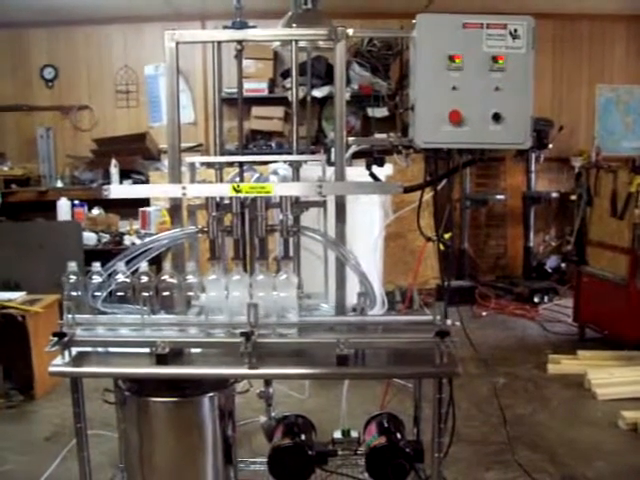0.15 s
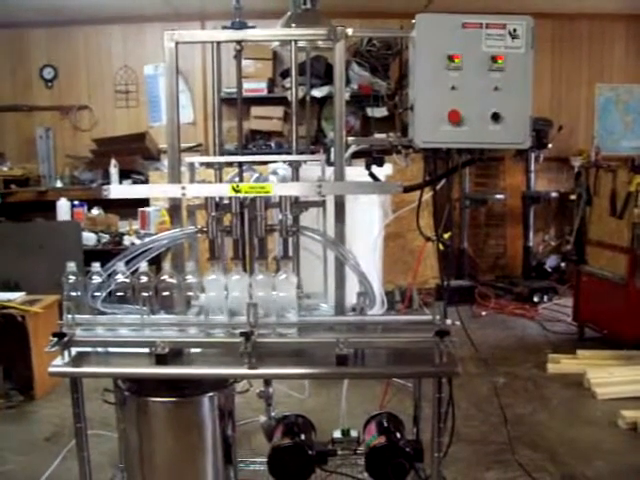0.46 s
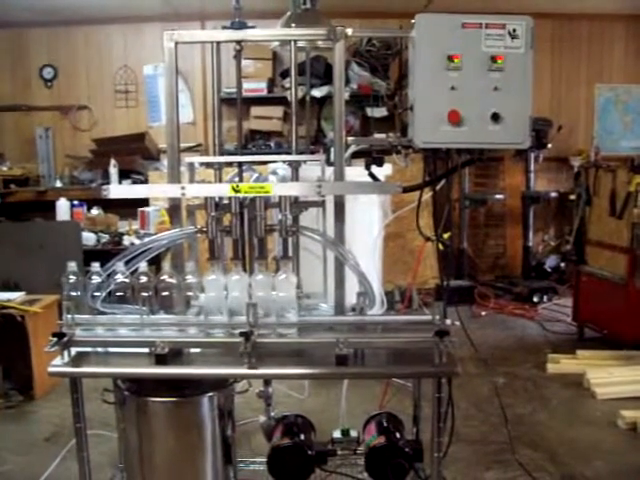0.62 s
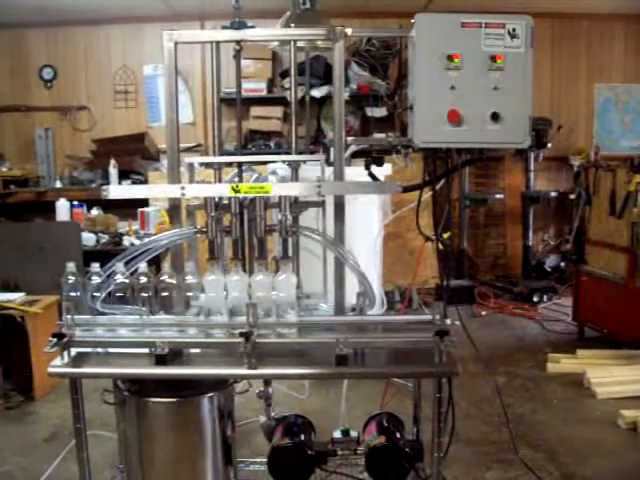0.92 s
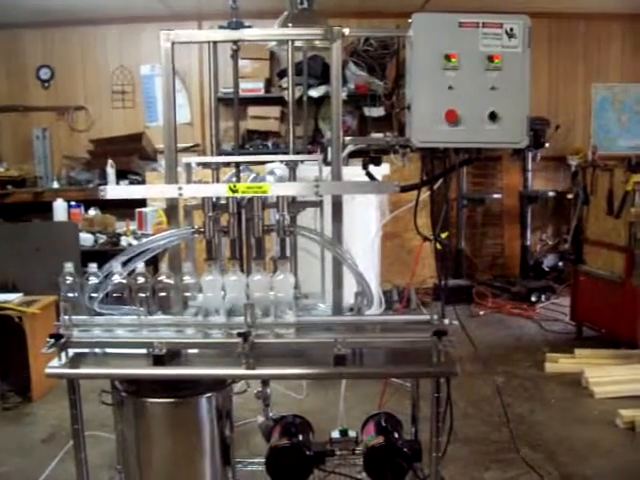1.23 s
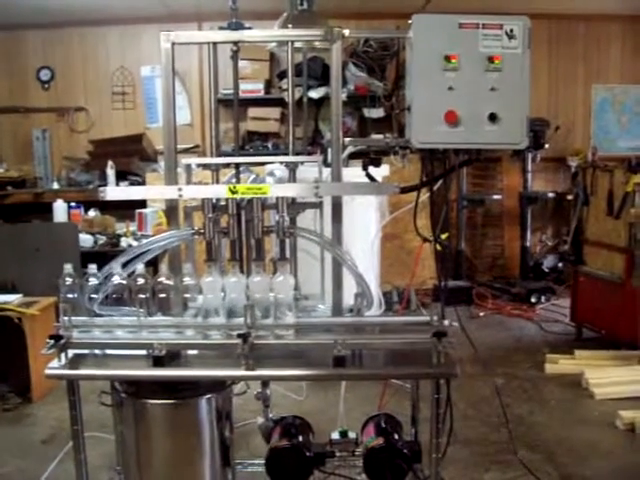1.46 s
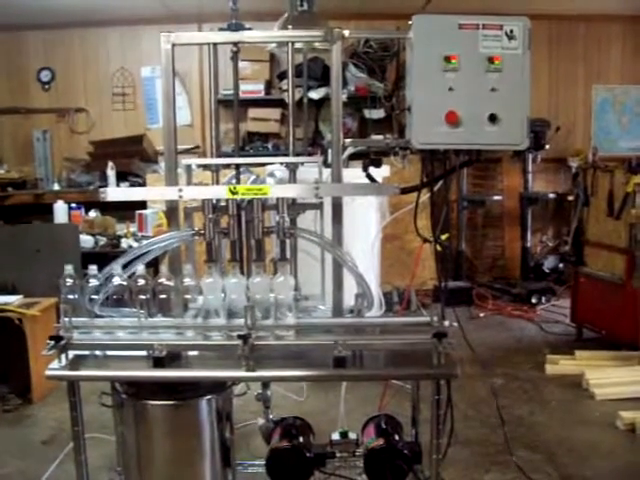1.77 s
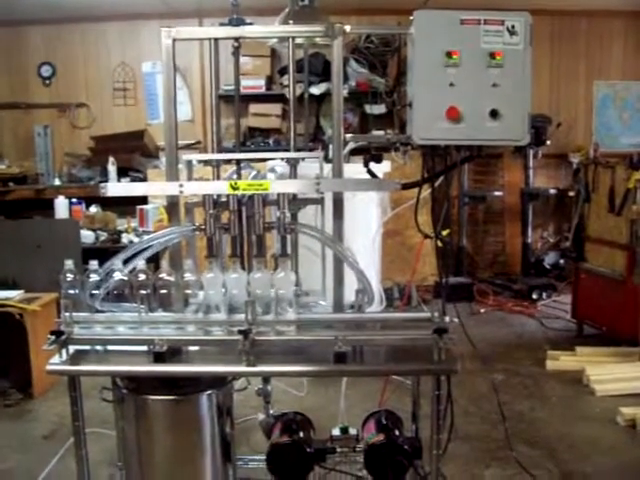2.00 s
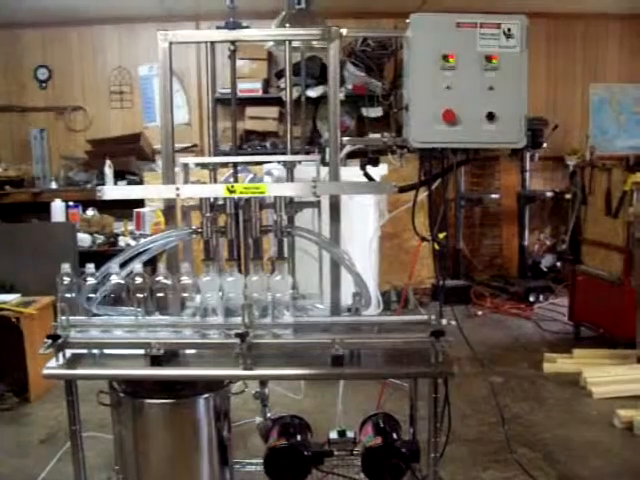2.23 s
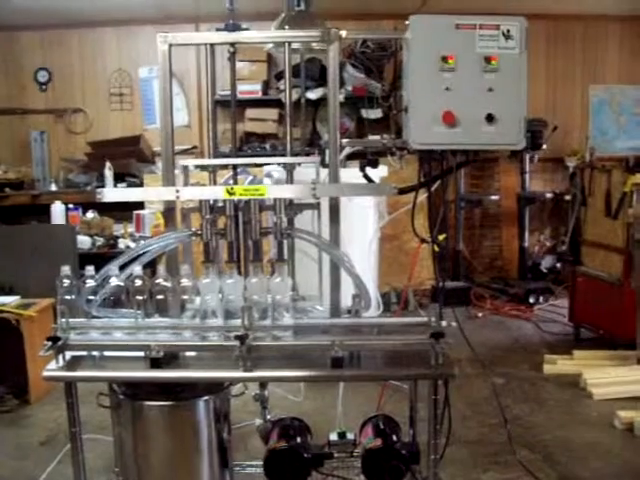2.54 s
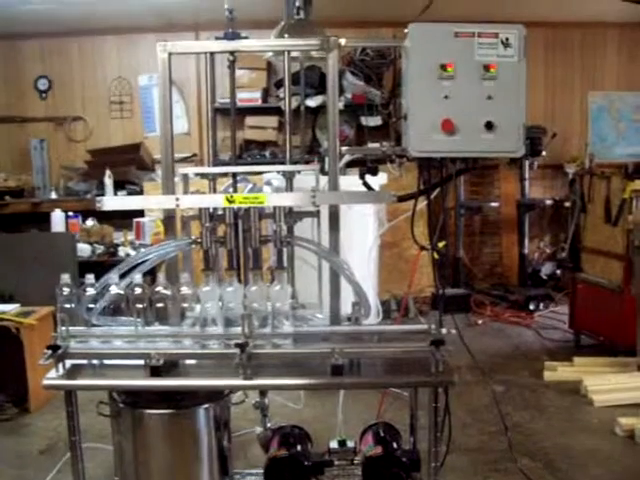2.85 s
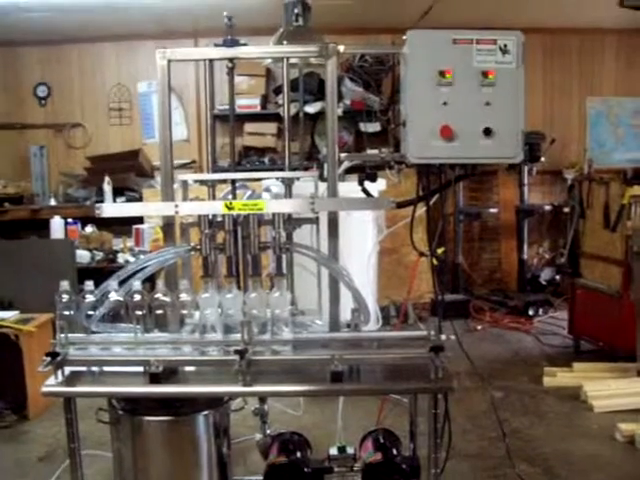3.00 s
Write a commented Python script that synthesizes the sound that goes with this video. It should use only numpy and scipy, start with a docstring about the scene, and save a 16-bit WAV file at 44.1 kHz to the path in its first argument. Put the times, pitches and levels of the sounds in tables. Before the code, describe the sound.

Filling machine running in a workshop, motors humming, air valve snapping, then a busier churning clatter.

```python
"""Bottle filler in a workshop

A bottle filling machine runs: motors hum and whine, the drive whirs and rattles in the steel frame, air hisses.
Tones are wavering oscillators; whir, clatter, knocks and air are noise shaped by resonances.
Twice an air valve snaps and vents, and the recorder's gain control ducks the machine.
After the first valve the machine works harder and a churning clatter joins in."""
import sys
import numpy as np
from scipy import signal
from scipy.fft import rfft, irfft
from scipy.io import wavfile
from scipy.ndimage import minimum_filter1d

SR = 44100
rng = np.random.default_rng(int(sys.argv[2]) if len(sys.argv) > 2 else 0)


def waveform_to_disk(signal):
    """Save audio, clipped to [-1, 1], as 16-bit WAV at the path in sys.argv[1]."""
    frames = np.transpose(np.atleast_2d(signal))
    scaled = np.clip(frames, -1, 1) * 32767
    samples = np.round(scaled).astype(np.int16)
    wavfile.write(sys.argv[1], SR, samples)


N = 140238
T = np.arange(N) / SR  # t/s
HZ = np.fft.rfftfreq(N, 1 / SR)  # f/Hz of every spectrum bin

LOAD_S, LOAD_RISE_S = 0.704, 0.11


def load():
    """Working load: 0 while the machine idles, a straight rise, then 1."""
    return np.clip((T - LOAD_S) / LOAD_RISE_S, 0, 1)


# shaft hum of the motors: [f/Hz, level/dB rms under load]
MOTOR_HUM = [(59.2, -46), (118.4, -55), (177.6, -51), (236.8, -50)]
HUM_IDLE_DB = -1  # relative to the hum under load
SURGE_DB, SURGE_S, SURGE_WIDTH_S = 1.5, 0.91, 0.11


def motor_hum(waver_rad=0.094):
    """Low sines with drifting phase; they swell as the pump takes up its load."""
    hum = 0
    for hz, db in MOTOR_HUM:
        phase = 2 * np.pi * (hz * T + rng.random()) + waver_rad * slow(3.6)
        hum = hum + np.sqrt(2) * gain_of(db) * np.sin(phase)
    surge_db = SURGE_DB * np.exp(-((T - SURGE_S) / SURGE_WIDTH_S) ** 2)
    return hum * gain_of(HUM_IDLE_DB * (1 - load()) + surge_db)


# whine of the drive: [f/Hz, idle level/dB rms, level/dB rms under load, width/Hz]
DRIVE_TONES = [(479, -34.5, -39.5, 2), (826.7, -35.5, -33.5, 4.3), (1017, -35, -41, 12.3),
               (1097, -41, -41.5, 10), (1517, -34.5, -42, 12), (1653, -38, -34.5, 1.2),
               (2477, -42, -41.5, 4)]


def drive_whine(unsteady=0.37):
    """Tones of the drive waver in pitch and strength, each at its own width."""
    whine = 0
    for hz, idle_db, load_db, width in DRIVE_TONES:
        wobble = 1 + unsteady * (slow(3 * width) + 1j * slow(3 * width))
        turns = np.cumsum(hz + 0.5 * width * slow(8.63)) / SR
        tone = evened((wobble * np.exp(2j * np.pi * turns)).real)
        level_db = idle_db + (load_db - idle_db) * load()
        whine = whine + gain_of(level_db) * tone
    return whine


# whir of the drive: [f/Hz, relative level/dB per Hz]
WHIR_SPECTRUM = [(20, -36.5), (45, -31), (90, -19), (160, -18.5), (260, -14), (350, -7), (440, -7),
                 (520, -4.5), (640, -4.5), (800, -2), (1000, 2), (1350, -4.5), (1900, -2), (2350, -11.5),
                 (3100, -18), (5000, -22), (10000, -55)]
WHIR_DB = -21


def drive_whir():
    """The running drive shakes the frame throughout."""
    return gain_of(WHIR_DB) * rattle(WHIR_SPECTRUM)


# clatter under load: [f/Hz, relative level/dB per Hz]
CHURN_SPECTRUM = [(100, -33), (350, -9), (620, -11.5), (780, 1.5), (950, 3.5), (1200, -4.5), (1450, -5.5),
                  (2100, -3), (2400, -10.5), (3000, -19), (4500, -11), (6500, -27.5), (10000, -63.5)]
CHURN_DB = -21.5
SHAFT_HZ, PUMP_DEPTH = 29.6, 0.081


def pump():
    """Clatter that comes in with the load and throbs once and four times a turn."""
    turn = 2 * np.pi * np.cumsum(SHAFT_HZ * (1 + 0.04 * slow(3.9))) / SR
    throb = np.sin(turn) + np.sin(4 * turn)
    return gain_of(CHURN_DB) * load() * (1 + PUMP_DEPTH * throb) * rattle(CHURN_SPECTRUM)


# resonances of the steel frame: [f/Hz, width/Hz, lift/dB]
FRAME_RESONANCES = [(156, 22, 3), (536, 70, 3), (780, 17, 3), (935, 30, 1), (920, 52, 1), (997, 18, 4),
                    (1065, 32, 4.5), (1228, 35, 4.5), (1420, 15, 0), (1532, 92, 3), (1640, 70, -1),
                    (1773, 35, -4), (2057, 126, 5.5), (2710, 270, 8.5), (3645, 73, 0.5)]
RATTLES_PER_S, RATTLE_SPREAD_DB = 1400, 2.2
RATTLE_SHARE = 0.4  # impacts' share of the power; rubbing has the rest
FLUTTER_DB, FLUTTER_HZ, SWELL_DB, SWELL_HZ = 0.5, 60, 0.45, 5


def rattle(spectrum):
    """Dense small impacts and rubbing ring the frame's resonances."""
    size = gain_of(RATTLE_SPREAD_DB * np.minimum(rng.exponential(1, N), 4))
    strikes = rng.random(N) < RATTLES_PER_S / SR
    impacts = evened(size * rng.choice([-1, 1], N) * strikes)
    rubbing = rng.standard_normal(N)
    drive = np.sqrt(RATTLE_SHARE) * impacts + np.sqrt(1 - RATTLE_SHARE) * rubbing
    drift_db = FLUTTER_DB * slow(FLUTTER_HZ) + SWELL_DB * slow(SWELL_HZ)
    return coloured(drive * gain_of(drift_db), read(spectrum) + lift(FRAME_RESONANCES))


# knocks in the clatter: [t/s, level/dB, f/Hz]
KNOCK_EVENTS = [(1.014, -24, 1100), (1.258, -10, 990), (2.114, -13, 1050), (2.242, -17, 1000),
                (2.539, -11.5, 980), (2.84, -9, 980), (2.966, -16, 1000)]
KNOCK_DECAY_S, KNOCK_OCTAVES = 0.0041, 0.16


def knocks():
    """Short dull knocks: decaying noise rings one narrow resonance each."""
    out = 0
    for s, db, hz in KNOCK_EVENTS:
        out = out + gain_of(db) * blow(struck(s, KNOCK_DECAY_S), hump(hz, KNOCK_OCTAVES))
    return out


# air valve: [t/s, snap level/dB, snap f/Hz, thud level/dB, vent level/dB, lower edge of the vent f/Hz]
VALVE_EVENTS = [(.5817, 6.5, 4930, -9, -8, 3400), (3.1201, 9, 6940, -7, -7.5, 5550)]
# spectrum of the venting air: [f/Hz, relative level/dB per Hz]
VENT_SPECTRUM = [(150, -8), (700, -5), (1500, -14), (2700, -1.5), (3700, 0), (6000, 3), (7100, 1),
                 (8000, -11.5), (9000, -10.5), (9600, -24.5), (10200, -41)]
# spectrum of the plunger's thud: [f/Hz, relative level/dB per Hz]
THUD_SPECTRUM = [(60, -18), (250, 2.5), (900, 7), (2000, -24), (6000, -22)]
SNAP_DECAY_S, SNAP_OCTAVES, THUD_DECAY_S, THUD_LEAD_S = 0.0025, 0.47, 0.0072, 0.001286
REBOUND_S, REBOUND_DB = 0.0087, -7  # after the snap, relative to it
VENT_HOLD_S, VENT_FALL_DB_PER_S = 0.07, 129
VENT_BELOW_DB = -7.5  # shelf under the lower edge
VENT_SPLIT_HZ, VENT_LOW_FALL_DB_PER_S = 5500, 27  # the lower part of the puff dies sooner


def valve(s, snap_db, snap_hz, thud_db, vent_db, edge_hz):
    """The plunger thuds, snaps and rebounds; air vents and thins as it dies away."""
    hits = struck(s, SNAP_DECAY_S) + gain_of(REBOUND_DB) * struck(s + REBOUND_S, SNAP_DECAY_S)
    snap = gain_of(snap_db) * blow(hits, hump(snap_hz, SNAP_OCTAVES))
    thud = gain_of(thud_db) * blow(struck(s - THUD_LEAD_S, THUD_DECAY_S), read(THUD_SPECTRUM))

    age = np.maximum(T - s, 0)
    flow_db = vent_db - VENT_FALL_DB_PER_S * np.maximum(age - VENT_HOLD_S, 0)
    flow = (T >= s) * gain_of(flow_db)
    shelf_db = VENT_BELOW_DB / (1 + (HZ / edge_hz) ** 20)
    jet = noise(read(VENT_SPECTRUM) + lift(FITTING_RESONANCES) + shelf_db)
    low = irfft(rfft(jet) / (1 + (HZ / VENT_SPLIT_HZ) ** 20), N)
    high = jet - low
    return snap + thud + flow * (high + low * gain_of(-VENT_LOW_FALL_DB_PER_S * age))


# escaping air: [f/Hz, relative level/dB per Hz]
AIR_SPECTRUM = [(1500, -24.5), (3000, -5.5), (3800, -5.5), (5100, -4.5), (5700, 1.5), (6800, 0), (7400, -3),
                (8000, -9), (8900, -13.5), (9500, -21), (10200, -43.5)]
# resonances of the air fittings, also heard in the vent: [f/Hz, width/Hz, lift/dB]
FITTING_RESONANCES = [(3690, 320, 4), (4450, 200, 1.5), (4720, 80, 0), (5590, 200, 0.5), (5990, 120, 1.5),
                      (6340, 150, 0.5), (6850, 190, 2.5)]
AIR_DB, AIR_LOADED_DB = -23.5, -25
AIR_LOADED_TILT_DB = -3  # per octave above 4000 Hz
SPUTTER_DB, SPUTTER_HZ, SPUTTER_ABOVE_HZ = 2.0, 150, 7200


def air():
    """A steady leak that turns softer and duller under load; its top sputters."""
    leak_db = read(AIR_SPECTRUM) + lift(FITTING_RESONANCES)
    tilt_db = AIR_LOADED_TILT_DB * np.log2(np.maximum(HZ, 4000))
    idle = gain_of(AIR_DB) * noise(leak_db)
    loaded = gain_of(AIR_LOADED_DB) * noise(leak_db + tilt_db)
    hiss = np.sqrt(1 - load()) * idle + np.sqrt(load()) * loaded
    top = irfft(rfft(hiss) * (HZ > SPUTTER_ABOVE_HZ), N)
    return hiss + top * (gain_of(SPUTTER_DB * slow(SPUTTER_HZ)) - 1)


ROOM_T60_S, ROOM_DB = 0.4, -12


def workshop(direct):
    """The place: a short diffuse tail of decaying noise follows the direct sound after 4 ms."""
    tail = rng.standard_normal(N) * (T > 0.004) * gain_of(-60 * T / ROOM_T60_S)
    tail = tail[:SR // 2]
    tail = tail / np.linalg.norm(tail)
    return direct + gain_of(ROOM_DB) * signal.fftconvolve(direct, tail)[:N]


def gain_of(db):
    """Decibels to gain."""
    return 10 ** (np.asarray(db) / 20)


def evened(x):
    """Scales to unit rms."""
    return x / np.sqrt(np.mean(x ** 2) + 1e-20)


def read(points):
    """A spectrum table in dB at every frequency, interpolated on a log axis."""
    f, db = np.transpose(points)
    return np.interp(np.log(HZ + 1), np.log(f), db)


def lift(resonances):
    """The dB bumps of a table of resonances."""
    return sum(db / (1 + (2 * (HZ - hz) / width) ** 2) for hz, width, db in resonances)


RING_TOP_HZ, RING_STEEPNESS = 7840, 26  # struck parts ring little above this


def hump(hz, octaves):
    """A resonance in dB, dull at the very top."""
    resonance_db = -20 * np.log10(1 + (np.log2((HZ + 1) / hz) / octaves) ** 2)
    return resonance_db - 10 * np.log10(1 + (HZ / RING_TOP_HZ) ** RING_STEEPNESS)


def coloured(x, db):
    """Filters by a dB spectrum; unit rms."""
    return evened(irfft(rfft(x) * gain_of(db), N))


def noise(db):
    """Steady noise with a dB spectrum; unit rms."""
    return coloured(rng.standard_normal(N), db)


def slow(hz):
    """Random drift up to a rate; unit rms."""
    return noise(-10 * np.log10(1 + (HZ / hz) ** 6))


def struck(s, decay_s):
    """Instant attack at s, exponential decay."""
    return (T >= s) * np.exp(-np.maximum(T - s, 0) / decay_s)


def blow(envelope, db):
    """A burst of noise rings through a dB spectrum."""
    burst = envelope * rng.choice([-1.0, 1.0], N)
    return irfft(rfft(burst) * evened(gain_of(db)), N)


def scene():
    """Hum and whine arrive without a tail; all else sounds in the workshop."""
    valves = sum(valve(*row) for row in VALVE_EVENTS)
    in_room = drive_whir() + pump() + knocks() + valves + air()
    return (motor_hum() + drive_whine() + workshop(in_room))[None]


MIC_LOW_HZ, EDGE_HZ = 40, 10150  # band of microphone and recorder
LIMIT_DB, RECOVER_DB_PER_S, GAIN_HOLD_S = -15.5, 54.5, 0.011
SENSE_S, LOOK_AHEAD_S = 0.01, 0.0013
CEILING = 0.92  # full scale is 1


def record(dry):
    """Low cut; gain control falls quickly, holds and recovers steadily; peaks clip; then the band limit."""
    low_cut = signal.butter(2, MIC_LOW_HZ, "high", fs=SR, output="sos")
    dry = signal.sosfilt(low_cut, dry)

    r = np.exp(-1 / (SENSE_S * SR))
    power = signal.lfilter([1 - r], [1, -r], dry[0] ** 2)
    power = np.interp(T + LOOK_AHEAD_S, T, power)
    over_db = np.maximum(10 * np.log10(power + 1e-12) - LIMIT_DB, 0)

    # the highest excess of the last moments is held, then falls at a constant rate
    half = max(int(GAIN_HOLD_S * SR / 2), 1)
    held_db = -minimum_filter1d(-over_db, 2 * half + 1, origin=half)
    fall_db = RECOVER_DB_PER_S * T
    duck_db = np.maximum.accumulate(held_db + fall_db) - fall_db
    clipped = np.clip(dry / gain_of(duck_db), -CEILING, CEILING)

    band_limit = signal.firwin(1023, EDGE_HZ, window=("kaiser", 9), fs=SR)
    return signal.oaconvolve(clipped, band_limit[None], "same")


dry = scene()
out = record(dry)
waveform_to_disk(out)
```